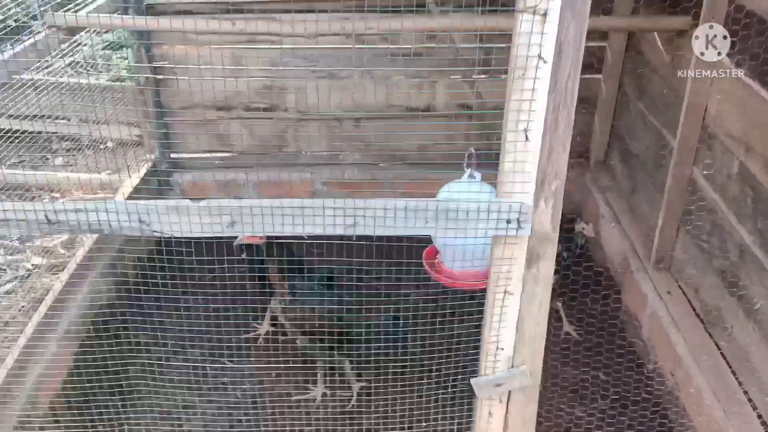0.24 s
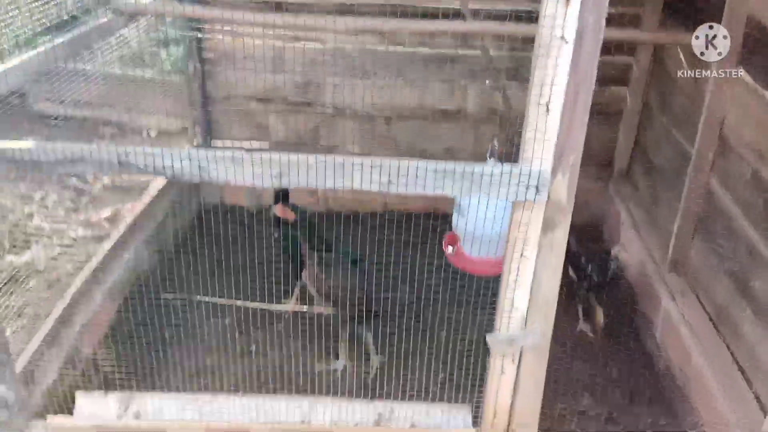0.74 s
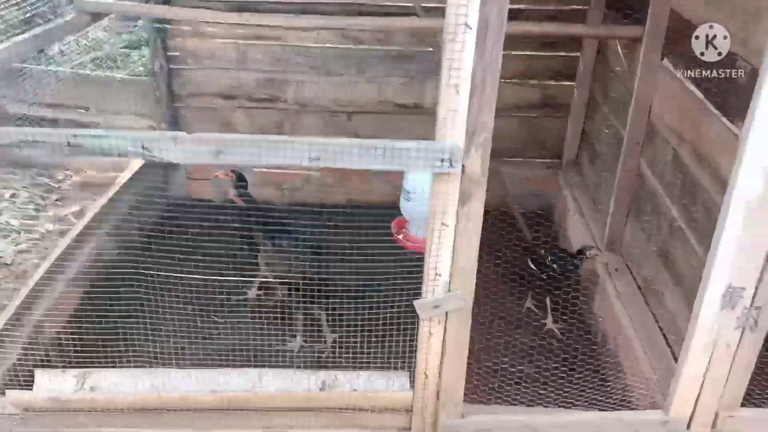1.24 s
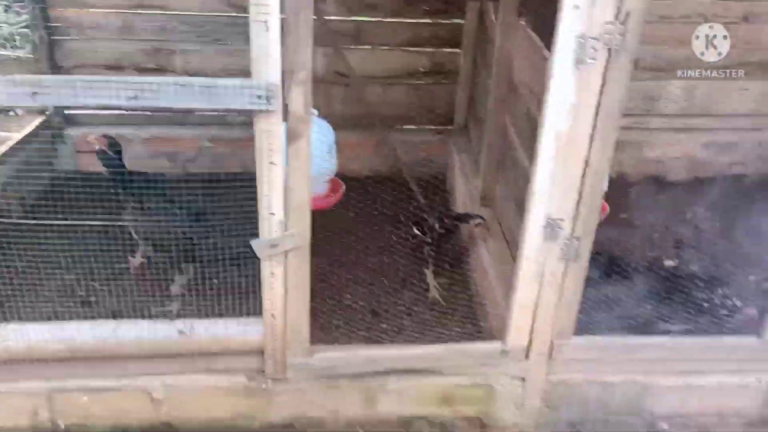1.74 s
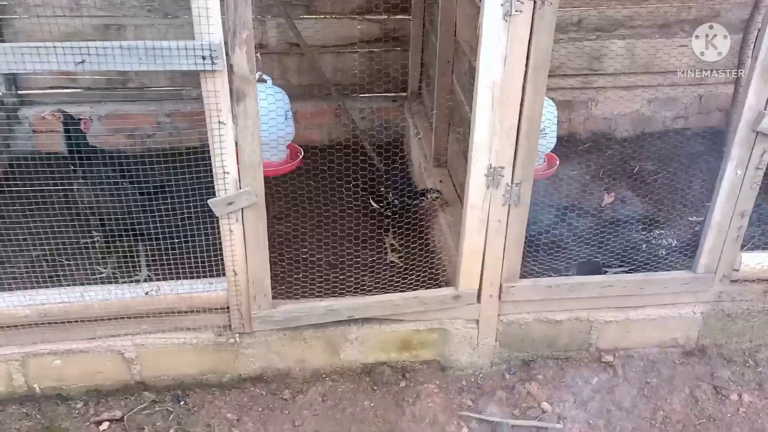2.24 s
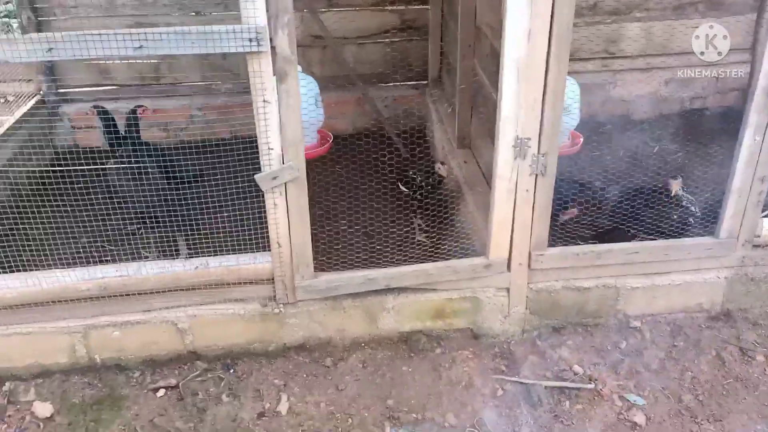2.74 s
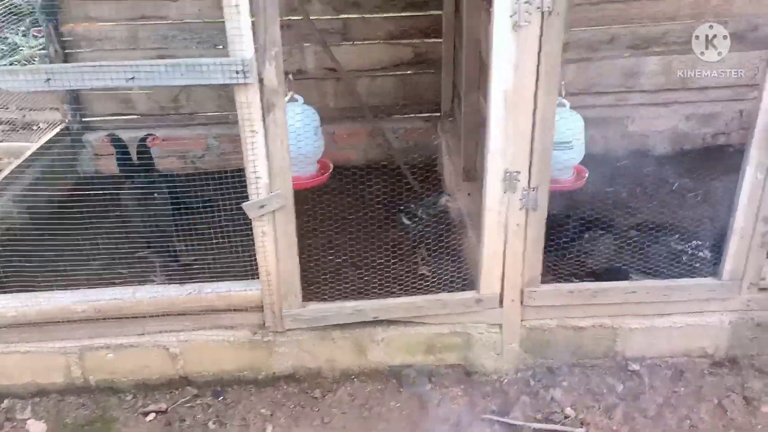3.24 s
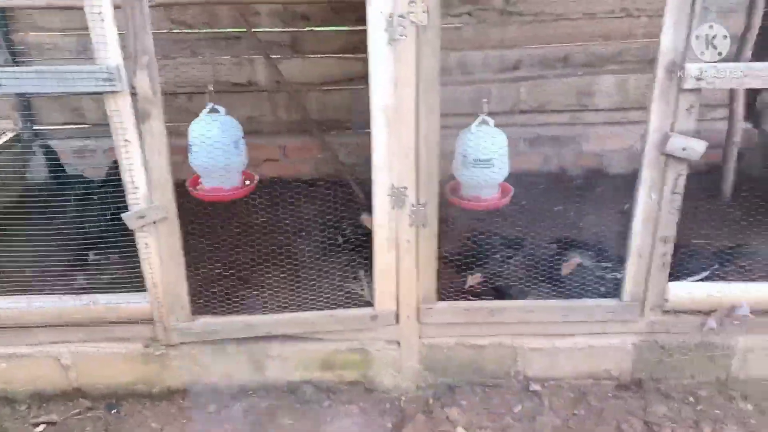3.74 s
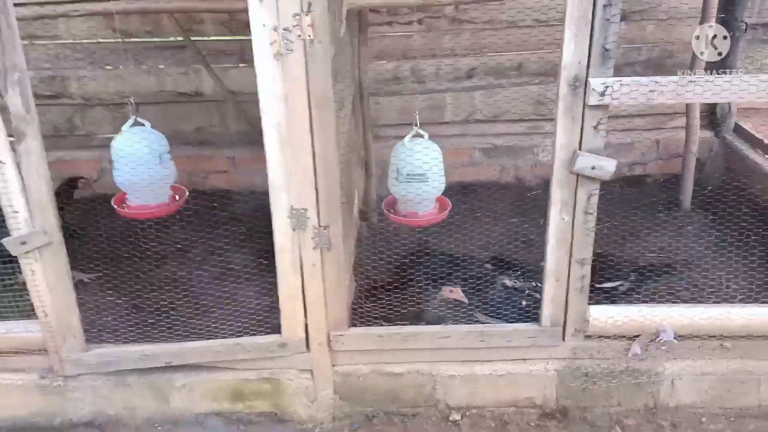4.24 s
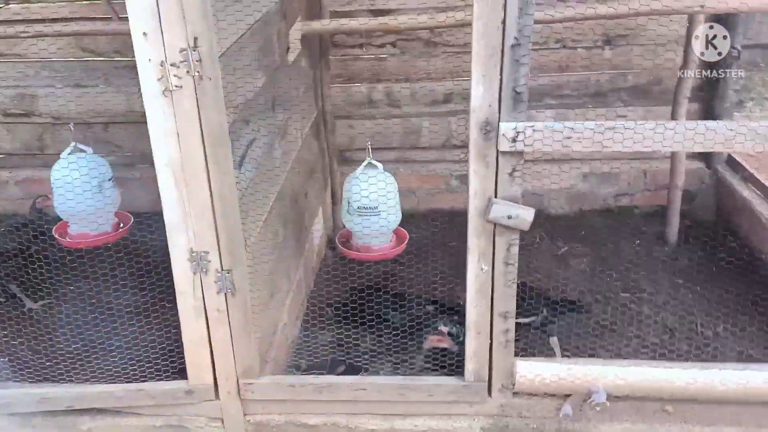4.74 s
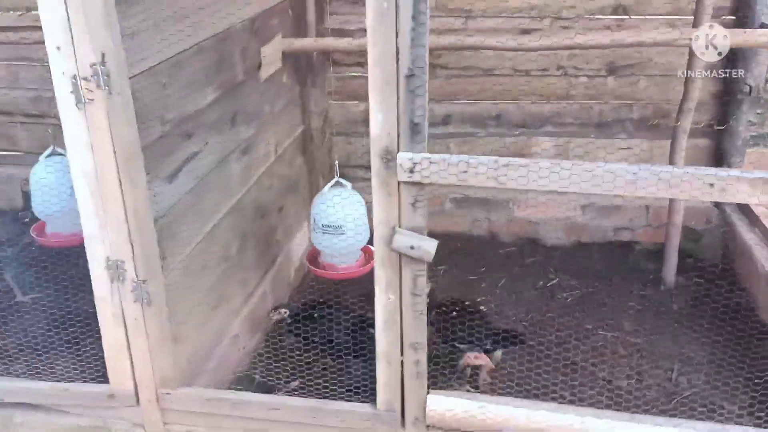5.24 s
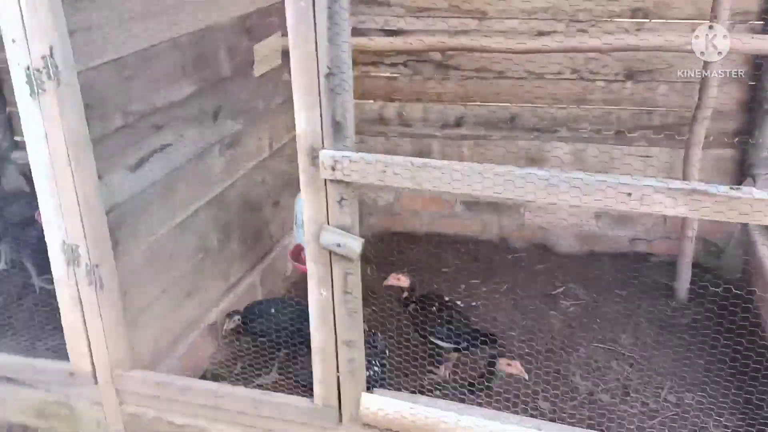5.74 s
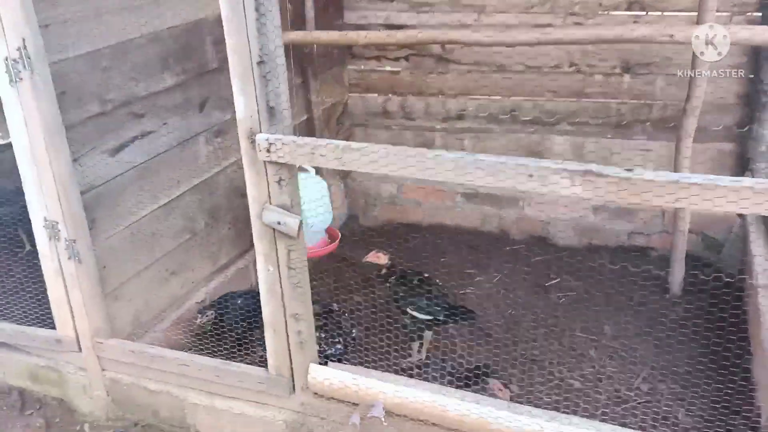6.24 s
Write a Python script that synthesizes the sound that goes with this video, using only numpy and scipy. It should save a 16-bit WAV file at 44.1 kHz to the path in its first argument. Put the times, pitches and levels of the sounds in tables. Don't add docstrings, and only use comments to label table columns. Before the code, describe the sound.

Several hens call in a plank-and-wire yard: brief buzzy clucks, a harsh early squawk, then two clearer, rising squawks well apart. Low croons, a soft coo and tiny bird peeps sit further off. Dry ticks and soft litter scuffs fill the gaps. The hand-held microphone is knocked and rubbed early on; behind lie breezy hiss, low traffic rumble, far motors and a thin insect whine.

```python
import sys
import numpy as np
from scipy import signal
from scipy.fft import rfft, irfft
from scipy.io import wavfile

SR = 44100
rng = np.random.default_rng(int(sys.argv[2]) if len(sys.argv) > 2 else 0)


def wrap_up_sound(samples):
    columns = np.atleast_2d(samples).T
    tamed = np.clip(columns, -1, 1)
    steps = np.round(tamed * 32767).astype(np.int16)
    wavfile.write(sys.argv[1], SR, steps)


def attenuation_scalar(level_db):
    decades = np.asarray(level_db, float) / 20
    return 10 ** decades


N = 285812


def rms_one(x):
    return x / np.sqrt(np.mean(x ** 2) + 1e-20)


def at_hz(points, hz):
    point_hz, point_db = np.transpose(points)
    return np.interp(np.log(hz), np.log(point_hz), point_db)


def wobble(size, rate_hz):
    r = np.exp(-2 * np.pi * rate_hz / SR)
    noise = rng.standard_normal(size + 1200)
    return rms_one(signal.lfilter([1], [1, -2 * r, r * r], noise)[1200:])


def band_pass(x, order, low_hz, high_hz):
    return signal.sosfilt(signal.butter(order, [low_hz, high_hz], "band", fs=SR, output="sos"), x)


def glide_sine(hz):
    return np.sin(2 * np.pi * np.cumsum(hz) / SR)


def add(out, s, sound, pan_db=0., lag_s=0.):
    for side, (gain_db, start) in enumerate([(pan_db / 2, s), (-pan_db / 2, s + lag_s)]):
        i = round(start * SR)
        piece = sound[max(-i, 0):N - i]
        out[side, max(i, 0):max(i, 0) + len(piece)] += attenuation_scalar(gain_db) * piece


def swells(rows):
    t = np.arange(0, N, 16) / SR
    gain = 0
    for s, db, rise_s, fall_s in rows:
        away = np.where(t < s, (s - t) / rise_s, (t - s) / fall_s)
        gain = gain + attenuation_scalar(db - 20 * away)
    return np.interp(np.arange(N) / SR, t, gain)


def coloured(spectrum, white):
    hz = np.maximum(np.arange(N // 2 + 1) * SR / N, 1)
    return irfft(rfft(white) * attenuation_scalar(at_hz(spectrum, hz)) * np.sqrt(SR / 2), N)


def grains(rate_per_s, spread_db, smooth):
    sizes = attenuation_scalar(spread_db * np.minimum(rng.exponential(1, (2, N)), 5))
    sizes = sizes * rng.choice([-1, 1], (2, N))
    clicks = sizes * (rng.random((2, N)) < rate_per_s / SR)
    return rms_one(clicks) + smooth * rng.standard_normal((2, N))


# time in seconds, left-right balance in dB, lag of the right side in ms.
HEN_BEARING = [(.4, -10, 0.37), (.85, -1, 0.49), (1.23, 2, 0.35), (2.97, 2.5, 0.44), (3.47, 7.5, 0.12),
               (4.5, 5, 0.56), (4.83, 2.1, 0.43), (5.3, 4.5, 0.36)]


def bearing(s):
    times, pan_db, lag_ms = np.transpose(HEN_BEARING)
    return np.interp(s, times, pan_db), np.interp(s, times, lag_ms) / 1000


def voice(pitch_hz, rough, throat, tilt_db, odd_db, mouth_hz, mouth_db, count):
    size, rough = len(pitch_hz), np.clip(rough, 0, 1)
    drift = 0.0047 * wobble(size, 42) + 0.00081 * wobble(size, 260)
    drift = drift + 0.16 * rough ** 2 * wobble(size, 350)
    turns = np.cumsum(pitch_hz * (1 + drift)) / SR
    out, power = np.zeros(size), 1e-12
    for k in range(1, count + 1):
        hz = k * pitch_hz
        mouth = mouth_db * np.exp(-((hz - mouth_hz) / 130) ** 2)
        gain = attenuation_scalar(at_hz(throat, hz) + tilt_db * np.log2(k / 2) + odd_db * (k % 2) + mouth)
        depth = 1.2 * rough + np.minimum((.35 + 5 * rough) * (hz / 4500) ** 2, .9)
        shake = attenuation_scalar(min(.2 + .09 * k * k, 5.5) * wobble(size, 18))
        shake = shake * (1 + depth * wobble(size, 145))
        out += gain * shake * np.sin(2 * np.pi * (k * turns + rng.random()))
        power = power + gain ** 2 / 2 * (1 + depth ** 2)
    return out / np.sqrt(power)


# time in seconds, pitch in Hz, level in dB, roughness from 0 to 1.
SQUAWK_CURVES = [
    [(.722, 565, -27, 0.02), (.736, 653, -31, 0.14), (.756, 688, -27, 0.13), (.785, 661.5, -29.5, 0.14),
     (.82, 623, -28.5, 0.03), (.88, 642, -35, 0.12), (.93, 663, -29, 0.06), (.968, 730, -30, 0.18),
     (.99, 760, -34.5, 0.32)],
    [(2.968, 520, -38, 0.3), (2.99, 619, -35.5, 0), (3.015, 641.5, -36, 0), (3.105, 620.4, -36, 0),
     (3.159, 627, -39.5, 0), (3.187, 655, -35.5, 0.01), (3.212, 688, -30, 0.02),
     (3.232, 716.4, -27.5, 0.17), (3.245, 740, -71, 0.2)],
    [(4.828, 574.5, -37, 0.36), (4.843, 665, -34.5, 0), (4.858, 692.7, -36.5, 0.07),
     (4.89, 642.4, -32.5, 0), (4.955, 631, -37.5, 0), (5.018, 645.6, -38.5, 0), (5.045, 663, -31.5, 0),
     (5.064, 769.6, -36.5, 0.13), (5.105, 709, -38, 0.17)],
]
# frequency in Hz, gain in dB.
SQUAWK_THROAT = [(300, -7), (640, -11), (1000, 28.5), (1350, 7.5), (1900, 3.5), (2550, -1), (3200, -7.5),
                 (3900, -13), (4500, -21), (5200, -25.5), (7000, -30.5), (11000, -58.5)]


def squawks():
    out = np.zeros((2, N))
    for rows in SQUAWK_CURVES:
        times, *columns = np.transpose(rows)
        t = np.arange(times[0], times[-1], 1 / SR)
        hz, db, rough = [np.interp(t, times, column) for column in columns]
        size = len(t)
        edges = signal.windows.tukey(size, .04)
        tilt_db = 1.5 - 10 * np.exp(-np.arange(size) / SR / .014)
        call = voice(hz, rough, SQUAWK_THROAT, tilt_db, 0, 1425, 10.9, count=18)
        rasp = rms_one(band_pass(rng.standard_normal(size), 2, 3000, 5000))
        call = call + attenuation_scalar(-3.5) * rough * rasp * np.linspace(0, 1, size) ** 2
        add(out, times[0], attenuation_scalar(db + 3.5) * call * edges, *bearing(times[0]))
    return out


# start in seconds, level in dB, pulse rate in Hz, mouth resonance in Hz, length in seconds.
CLUCK_CALLS = [(0.388, -34, 236.2, 1300, 0.061), (0.448, -37, 218.6, 1300, 0.03),
               (0.61, -31, 242.4, 1360, 0.056), (1.232, -30.5, 238.7, 1247, 0.033),
               (2.854, -39.5, 206.5, 1110, 0.064), (3.474, -51.5, 290, 1140, 0.032),
               (4.166, -48.5, 264.5, 1460, 0.035), (4.489, -43, 216.6, 1170, 0.051),
               (4.723, -43, 218.3, 1200, 0.059), (5.29, -36, 305.7, 1244, 0.0579),
               (5.387, -46.5, 294, 1280, 0.029), (5.557, -48, 247, 2230, 0.032),
               (6.264, -46, 233, 1260, 0.071), (6.336, -47.5, 232.4, 1235, 0.035)]
# frequency in Hz, gain in dB.
CLUCKING_THROAT = [(250, -16.5), (600, -20.5), (820, -23), (980, 2), (1250, 4), (1480, 2.5), (1750, -9.5),
                   (2080, -11.5), (2400, -4.5), (2900, -21.5), (3400, -17), (4200, -28), (9000, -45)]


def clucks():
    out = np.zeros((2, N))
    for s, db, hz, mouth_hz, length in CLUCK_CALLS:
        t = np.arange(round(2 * length * SR)) / SR / length
        rough = (-17 - db) / 75
        pitch_hz = hz * (1 - .16 * np.exp(-t / 0.253))
        shape = (1 - np.exp(-(t / .36) ** 2)) * np.exp(-(t / 0.95) ** 4)
        tilt_db = -10 * np.exp(-t / 0.16)
        odd_db = 0.04 * (hz - 228)
        call = voice(pitch_hz, rough, CLUCKING_THROAT, tilt_db, odd_db, mouth_hz, 10.9, count=18)
        add(out, s, attenuation_scalar(db - 0.5) * shape * call, *bearing(s))
    return out


# start in seconds, length in seconds, start pitch in Hz, end pitch in Hz, level in dB.
CLUCK_CORES = [(.62, 0.059, 936, 1004, -49), (1.234, 0.032, 1138, 1180, -31),
               (2.856, 0.025, 997, 1038, -45.5), (2.882, 0.046, 1214, 1215, -48),
               (3.471, .04, 1018, 1179, -42), (4.505, 0.03, 1121, 1112, -47.5),
               (4.732, 0.035, 1158, 1425, -44), (5.294, 0.0522, 1104, 1215, -34),
               (5.342, 0.074, 1238, 1177, -47), (6.268, 0.02, 952, 994, -55),
               (6.29, 0.043, 1402, 1400, -58)]
# multiple of the pitch, level in dB.
CLUCK_CORE_PARTIALS = [(.5, -27), (1, 3.5), (1.5, -17.5), (2, -14), (2.5, -30), (3, -43)]


def cluck_cores():
    out = np.zeros((2, N))
    for s, length, start_hz, end_hz, db in CLUCK_CORES:
        t = np.linspace(0, 1, round(length * SR))
        hz = end_hz + (start_hz - end_hz) * np.exp(-(t / 0.406) ** 2)
        hz = hz * (1 + 0.016 * wobble(len(t), 105))
        tone = 0
        for multiple, partial_db in CLUCK_CORE_PARTIALS:
            flutter_db = 3 * wobble(len(t), 90)
            tone = tone + attenuation_scalar(partial_db + flutter_db) * glide_sine(multiple * hz)
        add(out, s, attenuation_scalar(db) * np.hanning(len(t)) ** 0.52 * tone, *bearing(s))
    return out


# start in seconds, length in seconds,
# second partial at the start in Hz, the same at the end in Hz, level in dB.
FAR_CROONS = [
    (0.15, 0.2, 668.5, 622, -48),
    (1.474, 0.27, 679, 650, -65),
    (4.168, 0.344, 758, 636.7, -52.5),
    (5.33, 0.33, 654.6, 622, -54),
]
# frequency in Hz, gain in dB.
CROON_THROAT = [(300, -17), (640, 6), (960, -1), (1280, 13), (1620, 4), (2200, -4), (3000, -41),
                (4000, -15.5)]


def croons():
    out = np.zeros((2, N))
    for s, length, start_hz, end_hz, db in FAR_CROONS:
        t = np.arange(round(length * SR)) / SR
        hz = end_hz + (start_hz - end_hz) * np.exp(-t / 0.064)
        hz = hz * (1 + .012 * wobble(len(t), 6.1))
        shape = attenuation_scalar(db - 7 * t / length) * signal.windows.tukey(len(t), .3)
        call = voice(hz / 2, 0.303, CROON_THROAT, 0, 0, 634, 11.0, count=10)
        add(out, s, shape * call, .4, .00011)
    return out


# start in seconds, length in seconds, start pitch in Hz, end pitch in Hz, level in dB.
COOS = [
    (0.821, 0.19, 296, 330, -43),
    (1.035, 0.032, 302, 290, -46),
    (1.0, 0.048, 440, 430, -49),
]
# seconds, seconds, Hz, Hz,
# dB.
FAR_PEEPS = [(1.389, 0.098, 781, 729, -53), (1.769, 0.04, 1328, 1287, -45),
             (1.772, 0.032, 2670, 2540, -55.5), (2.284, 0.038, 3170, 2670, -65),
             (2.298, 0.02, 1380, 1350, -70), (2.36, 0.058, 2340, 2030, -82),
             (2.457, 0.043, 1428, 1410, -62.5), (2.545, 0.016, 1950, 1940, -57),
             (2.741, 0.023, 1315, 1490, -63), (2.472, 0.013, 3030, 2960, -65),
             (2.675, 0.056, 1500, 1620, -65), (2.695, 0.12, 2000, 2180, -71),
             (3.544, 0.019, 1880, 1750, -48.5), (3.835, 0.028, 2310, 1900, -72),
             (4.116, 0.012, 2180, 2140, -52), (4.575, 0.016, 3090, 3080, -49), (4.6, 0.02, 3040, 2800, -62),
             (4.782, 0.016, 4080, 3270, -53), (5.134, 0.22, 1013, 1146, -60), (5.37, 0.095, 835, 797, -56),
             (5.478, 0.096, 1575, 1610, -52), (5.708, 0.041, 1677, 1660, -46),
             (5.81, 0.02, 1730, 2120, -55), (5.916, 0.044, 2340, 2100, -51),
             (5.939, 0.049, 2090, 2000, -67), (6.092, 0.05, 2060, 1750, -74)]


def far_birds():
    out = np.zeros((2, N))
    for s, length, start_hz, end_hz, db in COOS:
        hz = np.linspace(start_hz, end_hz, round(length * SR))
        level = attenuation_scalar(db + 3 + 1.5 * wobble(len(hz), 25)) * np.hanning(len(hz)) ** 0.14
        add(out, s, level * glide_sine(hz))
    for s, length, start_hz, end_hz, db in FAR_PEEPS:
        hz = np.linspace(start_hz, end_hz, round(length * SR))
        hz = hz * (1 + 0.014 * wobble(len(hz), 180))
        level = attenuation_scalar(db + 2 + 3.4 * wobble(len(hz), 146)) * np.hanning(len(hz)) ** 0.24
        add(out, s, level * glide_sine(hz), 0, .0002)
    return out


# start in seconds, peak level in dB, centre in Hz, sharp edge in dB.
PECKS = [(.675, -37, 400, -34), (1.204, -45, 500, -19), (1.351, -48, 390, -17), (1.838, -52, 680, -10),
         (2.108, -52, 1280, -22), (2.217, -45, 1300, -20), (2.228, -40, 2400, -27), (2.274, -61, 1190, -14),
         (2.438, -50.5, 750, -25), (2.552, -48.5, 1700, -26), (2.593, -53, 1850, -12),
         (2.609, -53, 2260, -26), (2.64, -65, 890, -19), (2.777, -50.5, 2130, -25), (2.89, -48, 460, -3),
         (3.617, -35, 2500, -25), (3.64, -45, 745, -20), (3.772, -52, 770, -0.5), (4.119, -49, 2170, -14),
         (4.175, -38.5, 990, -14), (4.53, -49, 500, -17), (5.574, -49, 3600, -17), (5.702, -37, 750, 0.5),
         (5.864, -35.5, 2850, -33), (5.898, -37.5, 1220, -34), (5.898, -45, 402, -43),
         (6.109, -49, 2200, -32), (6.357, -46, 2340, -25), (6.44, -51, 2480, -5)]


def ticks():
    out, t = np.zeros((2, N)), np.arange(1500) / SR
    for s, db, hz, edge_db in PECKS:
        burst = rng.standard_normal((2, len(t))) * np.exp(-t / [[.0015], [.0007]])
        wood = band_pass(burst[0], 2, .62 * hz, 1.6 * hz)
        edge = band_pass(burst[1], 2, 3500, 11000)
        tick = wood / np.abs(wood).max() + attenuation_scalar(edge_db + 1) * edge / np.abs(edge).max()
        pan_db = -9 if hz < 1050 else 0.5
        add(out, s, attenuation_scalar(db) * tick, pan_db, .00007)
    return out


# peak in seconds, peak level in dB, rise and fall in seconds per 20 dB.
SCUFFLES = [
    (1.654, -60.5, 0.079, 0.025),
    (2.76, -86, 0.016, 0.051),
    (3.354, -61, 0.031, 0.039),
    (3.635, -88, 0.033, 1),
    (4.176, -63, 0.064, 0.053),
    (4.82, -56.5, 0.07, 0.036),
    (5.58, -61.5, 0.028, 0.061),
    (6.29, -59.5, 0.035, 0.1),
]
# frequency in Hz, level in dB per Hz.
LITTER_COLOUR = [(300, -45), (900, 7), (1500, 5), (3000, -5.5), (6000, -1), (10000, -19), (15500, -23)]


def litter():
    return attenuation_scalar(7.5) * swells(SCUFFLES) * rms_one(coloured(LITTER_COLOUR, grains(2500, 3.7, 0.94)))


# time in seconds, signed push, swing in Hz, width in cycles, crack in dB.
FINGER_BUMPS = [(0.013, 0.22, 1280, 0.43, -84), (0.019, -0.15, 503, 2.05, -66),
                (0.071, .015, 500, 5.1, -88), (0.1275, -.084, 209, 0.7, -53.5),
                (0.18, 0.18, 159, 0.47, -75), (0.212, 0.27, 610, 0.3, -52), (0.235, .01, 504, 1.1, -54),
                (.258, .01, 500, 0.92, -42), (0.2198, 0.12, 478, 0.55, -82), (.361, 0.52, 328, 0.56, -27.5),
                (0.3797, -.074, 151, 0.65, -44), (0.435, -0.02, 423, 4.6, -33),
                (.441, 1.07, 185, 0.41, -44), (0.47, -0.056, 176, 1.4, -60), (0.891, 0.068, 413, 1.4, -44),
                (1.411, 0.092, 153, 0.7, -54), (1.425, .04, 353, 0.84, -40), (1.492, .015, 400, 0.16, -51)]
# seconds, push, Hz, cycles, dB.
HAND_TAPS = [
    (0.459, 0.017, 2800, 2.7, -48),
    (.537, 0.01, 496.8, 1.3, -69),
    (.782, 0.049, 493.6, 1.04, -55),
    (0.801, .18, 634, 1.5, -33),
]


def bumps():
    out, t = np.zeros((2, N)), np.arange(-600, 900) / SR
    for rows, pan_db in [(FINGER_BUMPS, -43), (HAND_TAPS, 11)]:
        for s, push, hz, cycles, crack_db in rows:
            width = np.where(t < 0, .32, .75) * cycles / hz
            swing = -np.sin(2 * np.pi * hz * t * np.where(t < 0, 1, .75)) * np.exp(-(t / width) ** 2)
            crack = rng.standard_normal(len(t)) * np.exp(-np.abs(t + 0.12 / hz) / 0.00089)
            knock = 1.44 * push * swing + attenuation_scalar(crack_db) * crack
            add(out, s - 600 / SR, knock * attenuation_scalar(-abs(pan_db) / 2), pan_db)
    return signal.sosfilt(signal.butter(2, 55, "high", fs=SR, output="sos"), out + 1e-18)


# peak in seconds, peak level in dB, rise and fall in seconds per 20 dB.
RUBS = [
    (.002, -55.5, 0.0031, 0.074),
    (.18, -72, .004, 0.28),
    (.215, -63.5, 0.034, 0.088),
    (.258, -53.5, 0.023, 0.044),
    (.385, -63, 0.02, 0.13),
    (.47, -61, .12, 0.086),
    (1.36, -69.5, 0.016, 0.14),
    (1.42, -63, 0.036, 0.049),
    (1.475, -72, .1, 0.02),
]
# frequency in Hz, level in dB per Hz.
SKIN_COLOUR = [(60, -5), (300, -4), (800, -7.5), (2500, -13.5), (6000, -20), (10000, -24), (15500, -27.5)]


def rubbing():
    skin = rms_one(coloured(SKIN_COLOUR, grains(1500, 1.5, 0.61)))
    skin[0] = signal.sosfilt(signal.butter(2, 5000, fs=SR, output="sos"), skin[0])
    return swells(RUBS) * skin * attenuation_scalar([[-2], [24]])


# delay in seconds, level in dB.
WALL_SLAPS = [
    (.067, -3.5),
    (0.16, -26),
]


def yard(x):
    t60_s, coop_share, coop_lag_s = 0.56, 0.4, .00042
    t = np.arange(round(.9 * SR)) / SR
    white = rng.standard_normal((2, len(t))) * (t > .006)
    dull = signal.sosfilt(signal.butter(1, 13300, fs=SR, output="sos"), white)
    tail = dull * attenuation_scalar(-60 * t / t60_s) + 2.45 * white * attenuation_scalar(-60 * t / (0.23 * t60_s))
    for delay_s, db in WALL_SLAPS:
        tail += attenuation_scalar(db + 9) * dull * (t > delay_s) * np.exp(-np.abs(t - delay_s) / 0.0013)
    coop = np.roll(tail[0], round(coop_lag_s * SR))
    tail[1] = coop_share * coop + np.sqrt(1 - coop_share ** 2) * tail[1]
    tail = tail / np.sqrt(np.sum(tail ** 2, axis=1, keepdims=True))
    return signal.fftconvolve(x[[0, 0]], tail, axes=1)[:, :N]


# peak in seconds, peak level in dB, rise and fall in seconds per 20 dB.
INSECT_SWELLS = [
    (.42, -75, .05, 0.3),
    (.87, -50.5, 0.86, 0.26),
    (1.91, -66.5, 1, 1),
    (3.12, -65, 0.41, 0.084),
    (3.66, -65.5, 0.52, 0.27),
    (4.55, -61.5, 0.41, 0.16),
    (5.79, -63.5, 0.94, 0.72),
    (6.48, -63.5, 0.24, .1),
]


def insect():
    centre_hz, width_hz = 7150, 650
    low_hz, high_hz = centre_hz - width_hz / 2, centre_hz + width_hz / 2
    whine = band_pass(rng.standard_normal(N), 1, low_hz, high_hz)
    whine = rms_one(band_pass(whine, 1, low_hz, high_hz))
    return swells(INSECT_SWELLS) * whine * attenuation_scalar([[-9], [-4]])


# peak in seconds, peak level in dB, rise and fall in seconds per 20 dB.
MOTOR_SWELLS = [
    (1.3, -55.5, 0.47, 1.6),
    (2.5, -68.5, 1, 1.1),
    (5.45, -55.5, 0.69, .6),
]
# seconds, dB, seconds, seconds.
LORRY_SWELLS = [
    (4.5, -58, 0.93, 1),
    (5.3, -65, 0.83, 0.92),
    (6.1, -63.5, 0.61, 1.5),
]


def motors():
    out = 0
    for rows, hz in [(MOTOR_SWELLS, 104.2), (LORRY_SWELLS, 45.2)]:
        drone = band_pass(rng.standard_normal(N), 2, 0.847 * hz, 1.13 * hz)
        out = out + swells(rows) * rms_one(drone)
    return out


# frequency in Hz, level in dB per Hz.
AIR_COLOUR = [(25, -87), (50, -81.5), (120, -79.5), (250, -91), (500, -99), (1000, -108), (2000, -109),
              (3300, -116), (4900, -114), (8000, -121), (15500, -126)]
# frequency in Hz, likeness from -1 to 1.
AIR_LIKENESS = [(60, 0.91), (240, 0.93), (950, 0), (3770, 0), (15000, 0.22)]
# time in seconds, level in dB.
BREEZE_LEVEL = [(0, 19), (.11, 4.5), (.25, 6.5), (.5, 11.5), (1, 9.5), (1.5, 5.5), (2.5, -0.5), (3, 5.5),
                (3.9, -1.5), (4.3, 4.5), (4.7, 1), (5.1, 5), (5.9, 3), (6.48, -1)]


def air():
    hz = np.maximum(np.arange(N // 2 + 1) * SR / N, 1)
    alike = np.clip(at_hz(AIR_LIKENESS, hz), -1, 1)
    mid, side = rfft(coloured(AIR_COLOUR, rng.standard_normal((2, N))))
    both = np.sqrt(1 + alike) * mid + np.sqrt(1 - alike) * side * [[1], [-1]]
    bass = 1 / (1 + (hz / 400) ** 2)
    breeze_db = np.interp(np.arange(N) / SR, *np.transpose(BREEZE_LEVEL))
    rumble = irfft(both * bass, N) * attenuation_scalar(-2 + 0.22 * breeze_db)
    hiss = irfft(both * (1 - bass), N) * attenuation_scalar(breeze_db)
    return rumble + hiss


def scene():
    loud_calls = squawks()
    low_calls = clucks() + cluck_cores() + croons()
    small = ticks() + far_birds()
    echoes = attenuation_scalar(-9.5) * yard(attenuation_scalar(6.5) * loud_calls + attenuation_scalar(4.5) * low_calls + small)
    hands = bumps() + rubbing()
    return loud_calls + low_calls + small + echoes + litter() + hands + insect() + motors() + air()


# centre in Hz, width in Hz, gain in dB.
LEFT_CAVITIES = [(6700, 2080, -24.5), (10090, 5960, 23.5), (13870, 6360, -17)]
RIGHT_CAVITIES = [(6770, 1870, 10.5), (9760, 6500, -12.5), (14700, 1700, 10.5)]


def port(x, cavities):
    for hz, width_hz, db in cavities:
        w, g = 2 * np.pi * hz / SR, attenuation_scalar(db / 2)
        a = np.sin(w) * width_hz / hz / 2
        middle = -2 * np.cos(w)
        x = signal.lfilter([1 + a * g, middle, 1 - a * g], [1 + a / g, middle, 1 - a / g], x)
    return x


def roll_off(x):
    return signal.sosfilt(signal.butter(12, 16660, fs=SR, output="sos"), x)


def record(dry):
    ports = np.array([port(dry[0], LEFT_CAVITIES), port(dry[1], RIGHT_CAVITIES)])
    mix = signal.sosfilt(signal.cheby2(12, 50, 15950, fs=SR, output="sos"), ports)
    return roll_off(mix)


dry = scene()
out = record(dry)
wrap_up_sound(out)
```